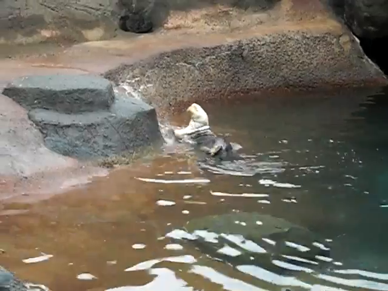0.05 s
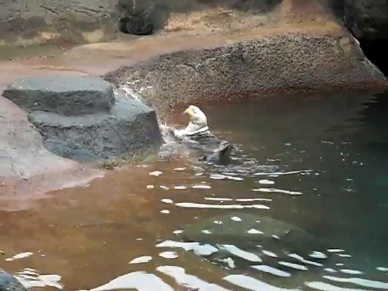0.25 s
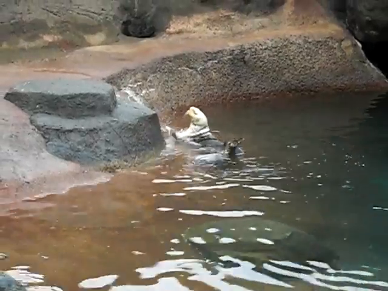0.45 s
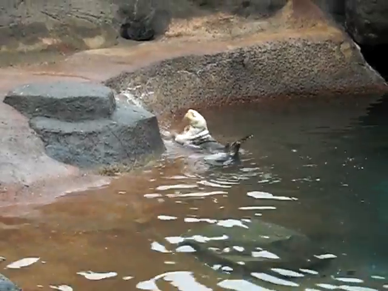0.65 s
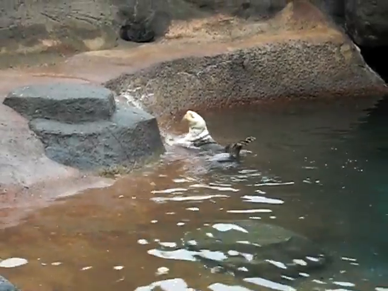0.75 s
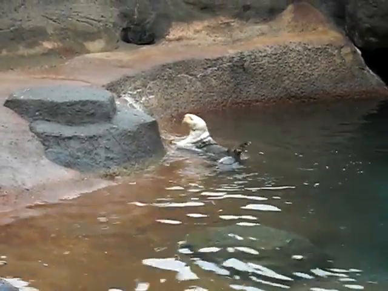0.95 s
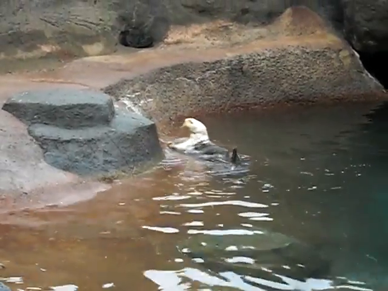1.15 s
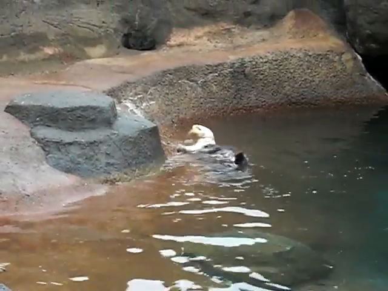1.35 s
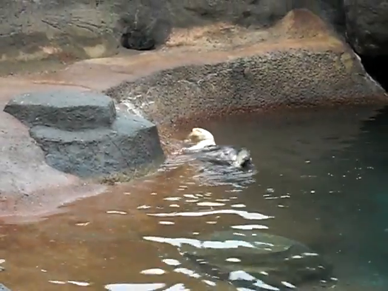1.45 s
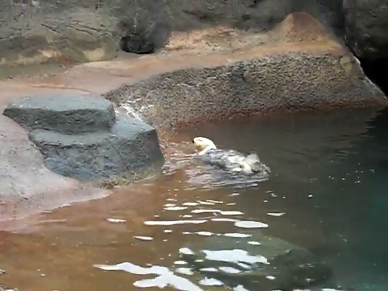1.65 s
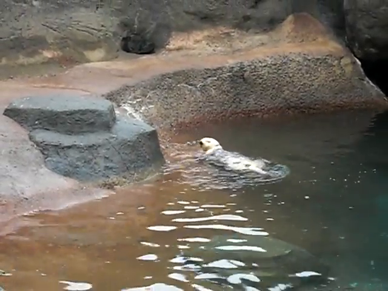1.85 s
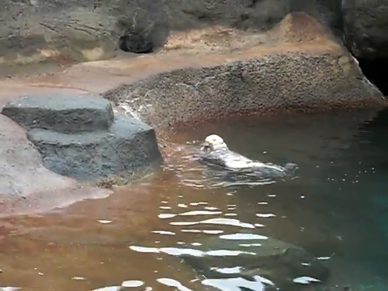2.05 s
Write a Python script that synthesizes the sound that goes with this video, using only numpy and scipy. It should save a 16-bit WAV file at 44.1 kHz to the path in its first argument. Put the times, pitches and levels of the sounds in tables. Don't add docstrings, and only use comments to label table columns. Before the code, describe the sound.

Sharp rhythmic knocks of a shell on rock by a pool, then small drips and fizzing water

```python
import sys
import numpy as np
from scipy import signal
from scipy.fft import rfft, irfft, next_fast_len
from scipy.io import wavfile
from scipy.ndimage import uniform_filter1d

SR = 44100
rng = np.random.default_rng(int(sys.argv[2]) if len(sys.argv) > 2 else 0)


def waveform_to_disk(signal):
    frames = np.transpose(np.atleast_2d(signal))
    scaled = np.clip(frames, -1, 1) * 32767
    samples = np.round(scaled).astype(np.int16)
    wavfile.write(sys.argv[1], SR, samples)


def amplitude_ratio(level_db):
    exponent = np.asarray(level_db, float) / 20
    return 10 ** exponent


N = 92610

# (frequency [Hz], level [dB])
HISS_SPECTRUM = [(25, -24), (87, -4.5), (300, -15), (560, -20), (800, -16.5), (1700, -28), (4000, -35.5),
                 (16000, -47)]
# (frequency [Hz], bandwidth [Hz], level [dB])
PUMPS = [(81.5, 6.9, -54), (117.2, 5.8, -55.5), (161, 28, -61.5), (53.6, 34, -63.5), (220.4, 52, -69.5)]
# (time [s], peak level [dB], pitch [Hz])
DRIPS = [(0.334, -43.5, 5160), (0.586, -45, 8800), (.763, -44, 6500), (1.053, -48, 11000),
         (1.157, -67.5, 1646), (1.2627, -45.5, 3000), (1.292, -47.5, 4640), (1.505, -50, 9100),
         (1.6004, -38, 3540), (1.611, -43.5, 3470), (1.659, -47, 6140), (1.671, -42, 3140),
         (1.6958, -40.5, 2260), (1.707, -46, 3000), (1.744, -46.5, 6500), (1.7706, -40.5, 3480),
         (1.785, -53, 4500), (1.804, -39.5, 5470), (1.843, -50.5, 4150), (1.854, -44.5, 2230),
         (1.925, -50, 8000), (2.09, -49.5, 3450)]
# (time [s], level [dB])
STIRRING = [(0, -57), (1.1, -70.5), (1.27, -62), (1.42, -68), (1.6, -67), (1.68, -60), (1.82, -61.5),
            (1.95, -68.5), (2.1, -66.5)]
# (delay [s], scatter [s], level [dB])
WALLS = [(0.021, 0.0068, 4), (0.07, 0.0078, -12)]
# (frequency [Hz], T60 [s])
REVERBERATION = [(300, 1), (1000, 0.48), (4000, .5), (8000, 0.41), (15000, 0.36)]
# (time [s], strength [dB], low ring [Hz], high ring [Hz])
KNOCKS = [
    (0.2177, -15, 2030, 3630),
    (0.419, -14, 840, 3150),
    (0.615, -17, 2130, 3700),
    (0.8123, -18, 970, 2120),
    (1.002, -25, 1630, 4950),
    (.02, -13, 810, 3000),
]
# (crunch decay [s], scrape [dB], first impact [dB], low ring [dB], high ring [dB])
CONTACTS = [(0.0036, -6, 11.5, 11.5, 8), (0.0019, -12, 17, 4.5, 10), (0.0028, -42, 9, 3, 6),
            (0.0038, -18, 4, 6, 8.5), (0.0037, -21, 9, 10.5, 4), (0.0022, -12, 11, 3, 7)]
# (echo [dB], tail [dB], low ring [dB], high ring [dB])
ANSWERS = [(-5, -7, 1.5, 6.5), (-1.5, -3.5, 7, 7.5), (-2, -5.5, -1, 4), (-4, -3.5, 4.5, 6),
           (-7, -7.5, -1, -2), (-6, -3.5, 8.5, -3)]
# (delay [s], level [dB], ring [Hz])
SLAPS = [(.0222, -5.5, 3370), (.022, -10, 770), (0.011, -21.5, 4400), (.019, -9, 1790), (0.014, -18, 3700),
         (0.018, -12, 570)]
GRIP_HZ = [180, 320, 700, 1400, 2800, 5500, 10000, 16000]
GRIPS = [
    [-28, -6.5, -2.5, -4.5, -4.5, -12, -20.5, -25],
    [-28, -10, -4, -11.5, -15.5, -19, -24.5, -30.5],
    [-33, -6.5, -0.5, -6, -2.5, -4.5, -14, -24],
    [-35, -12.5, -5, -5.5, -8, -11.5, -22.5, -21.5],
    [-29, -24, -12.5, -4.5, -8.5, -10.5, -25.5, -28],
    [-22, -7.5, -5, -11, -12, -18.5, -23, -34],
]
# (time [s], gain [dB])
FADE_IN = [(.035, -47), (.12, -23), (.17, -7), (.2, 4), (.27, 5.5)]

HISS_DB = -55
DRIP_CYCLES, DRIP_PITCH_RISE = 6.4, 0.14
TICK_DB, TICK_T60_S, TICK_WIDTH = -8, 0.0061, 1.4
FIZZ_PER_S, FIZZ_HZ, FIZZ_CYCLES = 1100, 3000, 1.95
FIZZ_PITCH_SPREAD, FIZZ_LEVEL_SPREAD_DB = 0.49, 4.5
FACET_SPREAD_DB, TAIL_RISE_S = 3.5, 0.0031
SHELL_Q, SCRAPE_S, SLAP_RING_DB = 3.9, 0.0018, 26
START_S, TOP_HZ = 0.035, 15900


def unit(x):
    return x / np.sqrt(np.mean(x ** 2) + 1e-20)


def along(points, hz):
    f, v = np.transpose(points)
    return np.interp(np.log(hz + 1), np.log(f + 1), v)


def over_time(points):
    s, level_db = np.transpose(points)
    return amplitude_ratio(np.interp(np.arange(N) / SR, s, level_db))


def filtered(x, response):
    m = next_fast_len(len(x) + 8192)
    return irfft(rfft(x, m) * response(np.fft.rfftfreq(m, 1 / SR)), m)[:len(x)]


def peak(f, hz, width_hz):
    return 1j * f * width_hz / (hz * hz - f * f + 1j * f * width_hz)


def add(track, s, x):
    part = track[round(s * SR):][:len(x)]
    part += x[:len(part)]


def background():
    hiss = filtered(rng.standard_normal(N), lambda f: amplitude_ratio(along(HISS_SPECTRUM, f)))
    hiss = hiss / np.std(filtered(hiss, lambda f: f > 250))
    hum = np.zeros(N)
    for hz, width_hz, db in PUMPS:
        drone = filtered(rng.standard_normal(N), lambda f: peak(f, hz, width_hz) ** 2)
        hum += amplitude_ratio(db) * unit(drone)
    return amplitude_ratio(HISS_DB) * hiss + hum


def facets(size):
    unevenness = amplitude_ratio(FACET_SPREAD_DB * rng.standard_normal(size))
    return unit(rng.standard_normal(size) * unevenness)


def rocks(echo_db, tail_db):
    t = np.arange(SR // 2) / SR
    density = sum(amplitude_ratio(db) * np.exp(-.5 * ((t - s) / spread) ** 2) for s, spread, db in WALLS)
    walls = density * facets(len(t))
    hz, frame_s, z = signal.stft(rng.standard_normal(len(t)), SR, nperseg=256)
    decay = amplitude_ratio(-60 * frame_s / along(REVERBERATION, hz)[:, None])
    tail = signal.istft(z * decay, SR, nperseg=256)[1][:len(t)]
    tail = tail * (1 - np.exp(-t / TAIL_RISE_S))
    return amplitude_ratio(echo_db) * walls / np.linalg.norm(walls) + amplitude_ratio(tail_db) * tail / np.linalg.norm(tail)


def bubble(hz, cycles, t):
    u = t * hz / cycles
    phase = 2 * np.pi * hz * t * (1 + DRIP_PITCH_RISE * np.minimum(u, 2) / 2)
    return np.sin(phase) * np.exp(-2 * u) * (1 - np.exp(-20 * u))


def drips(t):
    out = np.zeros(N)
    for s, db, hz in DRIPS:
        splash = filtered(rng.standard_normal(len(t)), lambda f: peak(f, 1.35 * hz, TICK_WIDTH * hz) ** 2)
        tick = amplitude_ratio(TICK_DB - 60 * t / TICK_T60_S) * unit(splash)
        add(out, s, amplitude_ratio(db) * (bubble(hz, DRIP_CYCLES, t) + tick))
    return out


def fizz(t):
    count = 2400
    draw = rng.standard_normal((count, 2))
    start = (np.cumsum(rng.exponential(size=count)) * SR / FIZZ_PER_S).astype(int)
    hz = np.clip(FIZZ_HZ * np.exp(FIZZ_PITCH_SPREAD * draw[:, :1]), 500, 14000)
    grains = amplitude_ratio(FIZZ_LEVEL_SPREAD_DB * draw[:, 1:]) * bubble(hz, FIZZ_CYCLES, t)
    samples = start[:, None] + np.arange(len(t))
    out = np.bincount(samples.ravel(), grains.ravel(), N)[:N]
    return unit(out) * over_time(STIRRING)


def water():
    t = np.arange(512) / SR
    wet = drips(t) + fizz(t)
    return wet + signal.fftconvolve(wet, rocks(-20, -8))[:N]


def struck(force, grip, rings):
    f = np.fft.rfftfreq(4096, 1 / SR)
    level_db = along(grip, f) + sum(db * np.abs(peak(f, hz, hz / SHELL_Q)) ** 2 for hz, db in rings)
    ceps = irfft(np.log(amplitude_ratio(np.maximum(level_db, -60))))
    ceps[1:2048] *= 2
    ceps[2049:] = 0
    return signal.fftconvolve(force, irfft(np.exp(rfft(ceps))))[:len(force)]


def crunch_force(t, decay_s, scrape_db, impact_db):
    scrape = amplitude_ratio(scrape_db) * np.exp(-(t / SCRAPE_S) ** 2)
    shape = np.where(t < 0, scrape, np.exp(-t / decay_s))
    spectrum = rfft(shape * facets(len(t)))
    spectrum = spectrum / uniform_filter1d(np.abs(spectrum), size=15)
    force = irfft(spectrum, len(t)) * np.minimum(1, 4 * shape)
    return force / np.abs(force).max() - amplitude_ratio(impact_db) * (t == 0) / 2


def shell():
    out = np.zeros(N)
    t = (np.arange(1536) - 256) / SR
    click = 1. * (t == 0)
    for knock, grip_db, contact, answer, slap_face in zip(KNOCKS, GRIPS, CONTACTS, ANSWERS, SLAPS):
        s, db, *ring_hz = knock
        decay_s, scrape_db, impact_db, *near_db = contact
        echo_db, tail_db, *far_db = answer
        slap_s, slap_db, slap_hz = slap_face
        grip = list(zip(GRIP_HZ, grip_db))
        blow = struck(crunch_force(t, decay_s, scrape_db, impact_db), grip, zip(ring_hz, near_db))
        blow = amplitude_ratio(db) * blow / np.abs(blow).max()
        far = struck(click, grip, zip(ring_hz, far_db))
        slap = struck(click, grip, [(slap_hz, SLAP_RING_DB)])
        far = far * np.linalg.norm(blow) / np.linalg.norm(far)
        slap = slap * np.linalg.norm(blow) / np.linalg.norm(slap)
        start_s = s + t[0]
        add(out, start_s, blow)
        add(out, start_s + slap_s, amplitude_ratio(slap_db) * slap)
        add(out, start_s, signal.fftconvolve(far, rocks(echo_db, tail_db)))
    return out


def scene():
    return (background() + water() + shell())[None]


def band_limit(x):
    return signal.sosfilt(signal.butter(12, 16820, fs=SR, output="sos"), x)


def record(dry):
    x = filtered(dry[0], lambda f: amplitude_ratio(-25 * np.clip((f - TOP_HZ) / 300, 0, 1)))
    x = x * over_time(FADE_IN) * (np.arange(N) > START_S * SR)
    return band_limit(x[None])


dry = scene()
out = record(dry)
waveform_to_disk(out)
```